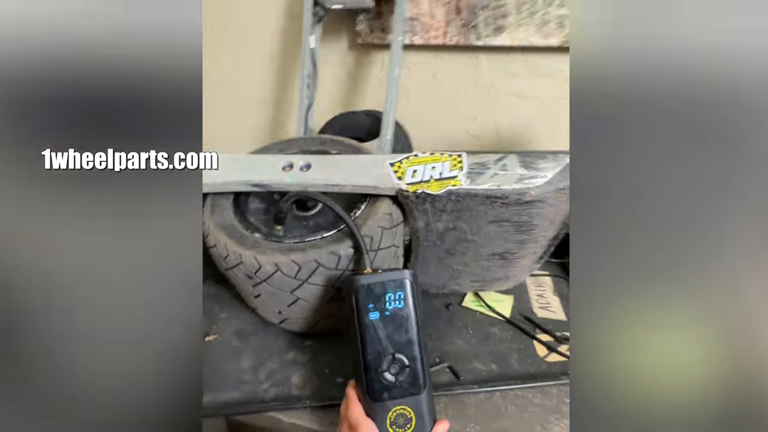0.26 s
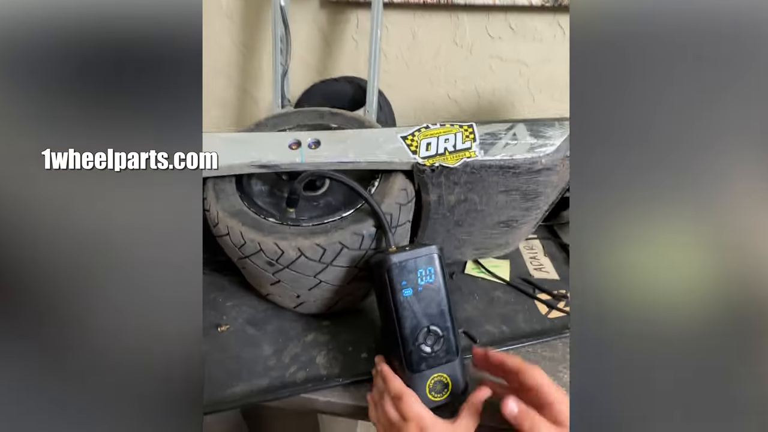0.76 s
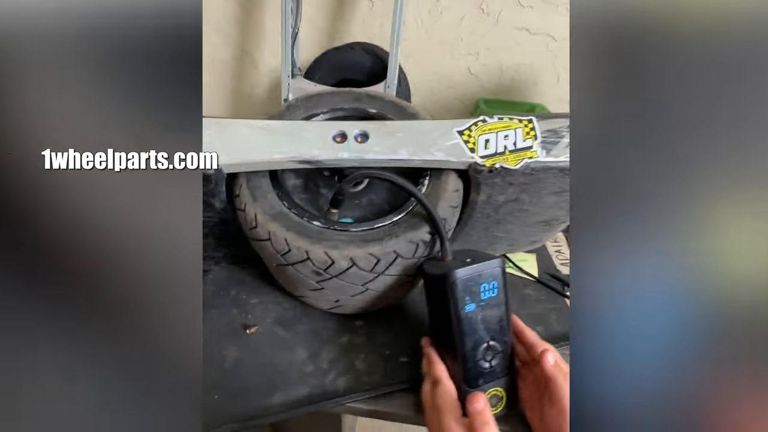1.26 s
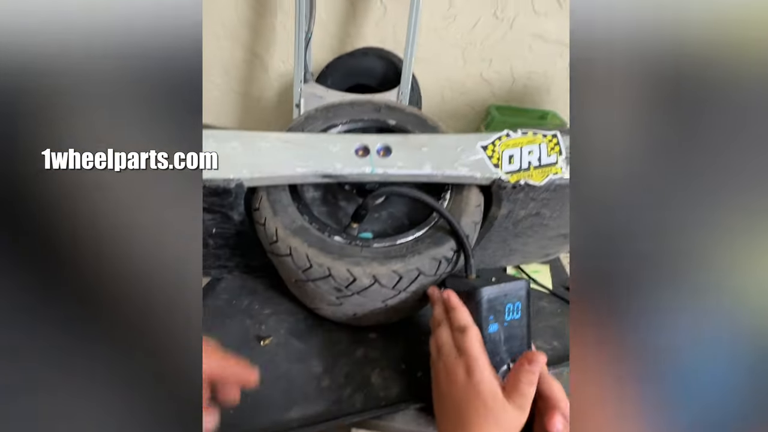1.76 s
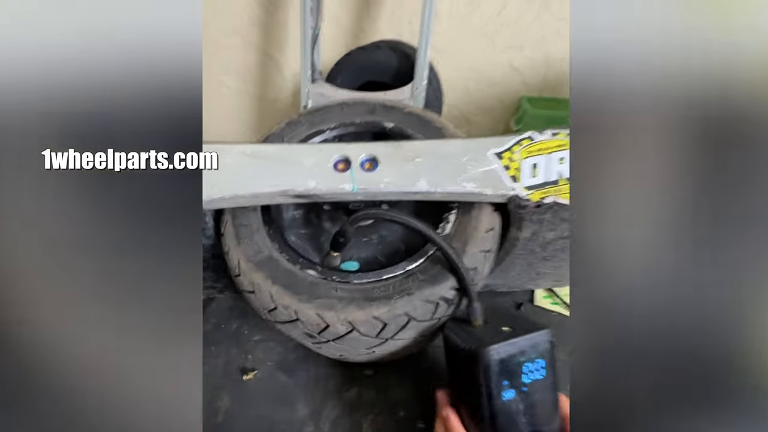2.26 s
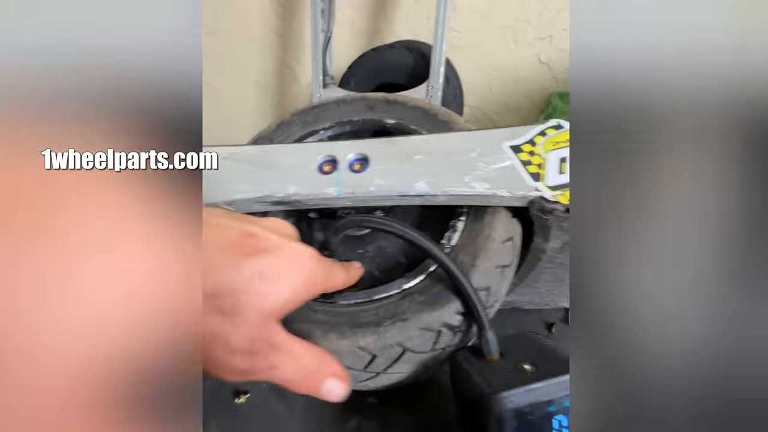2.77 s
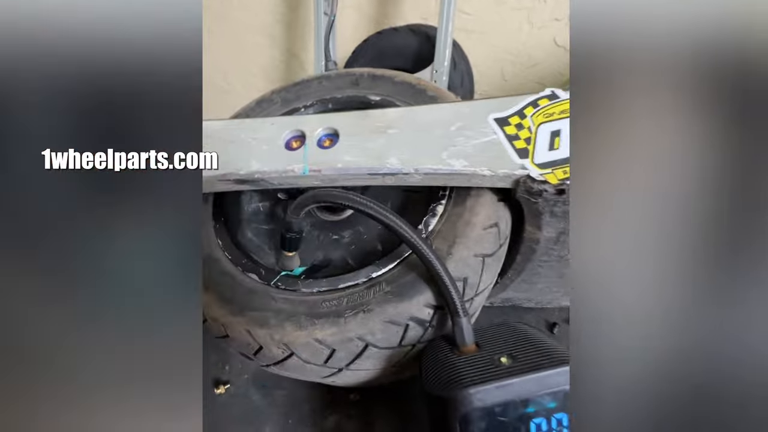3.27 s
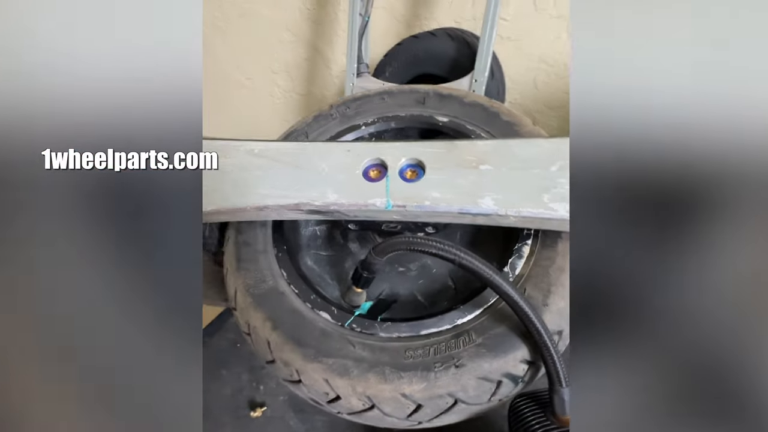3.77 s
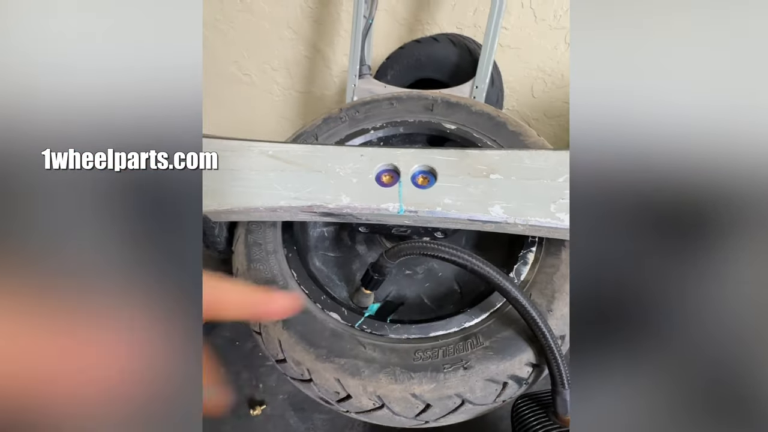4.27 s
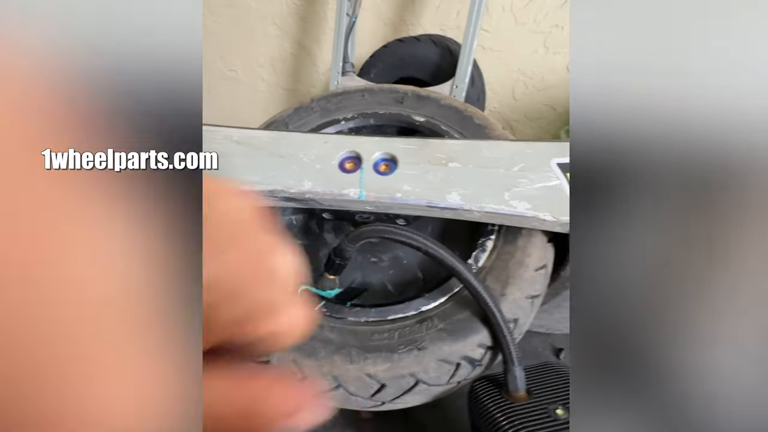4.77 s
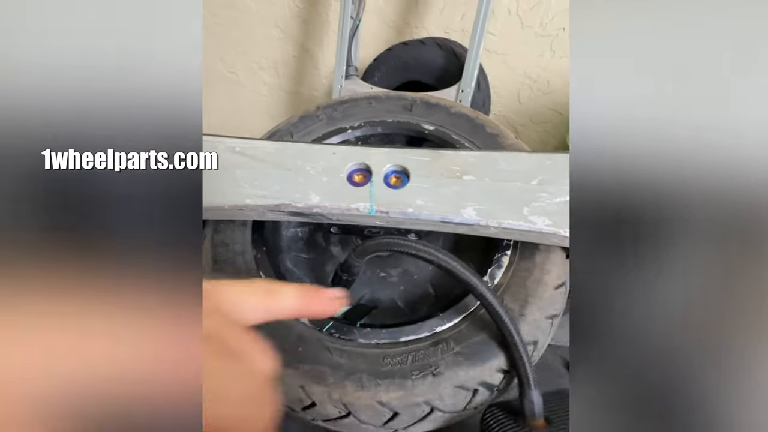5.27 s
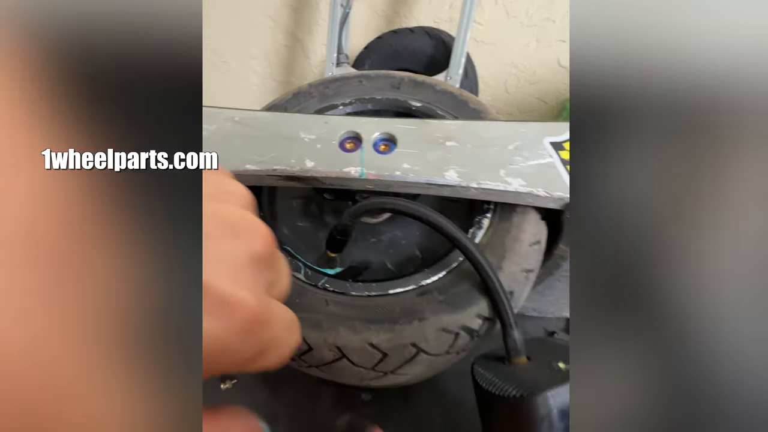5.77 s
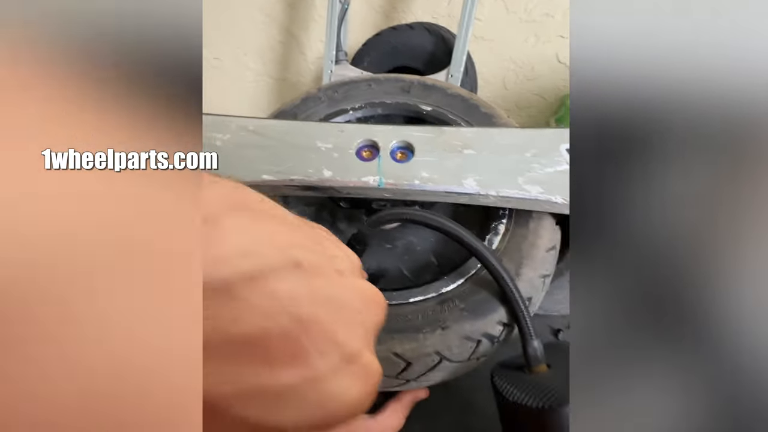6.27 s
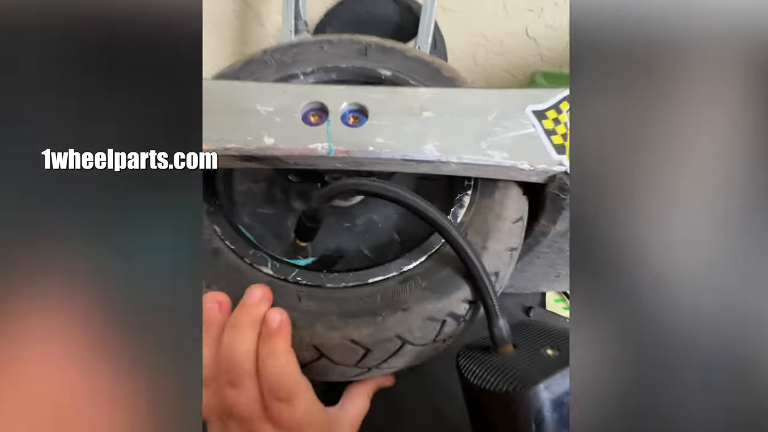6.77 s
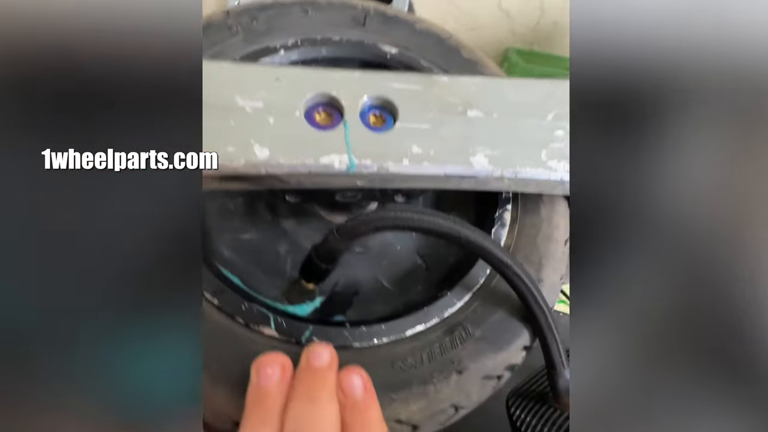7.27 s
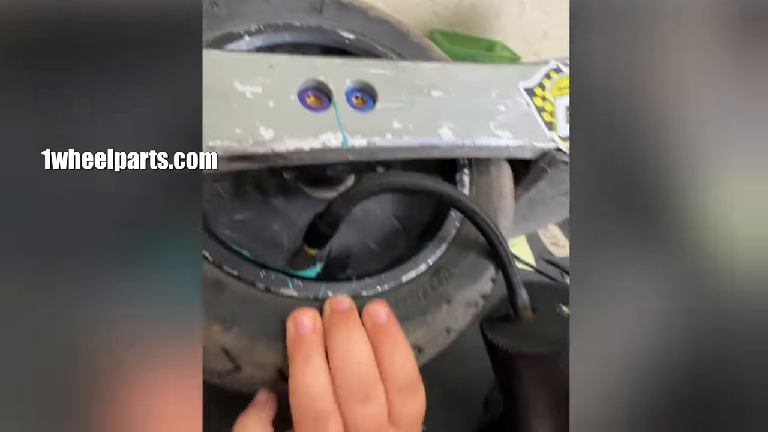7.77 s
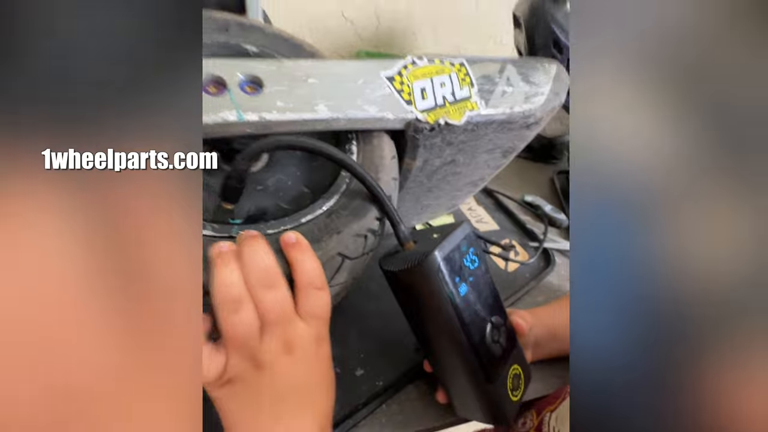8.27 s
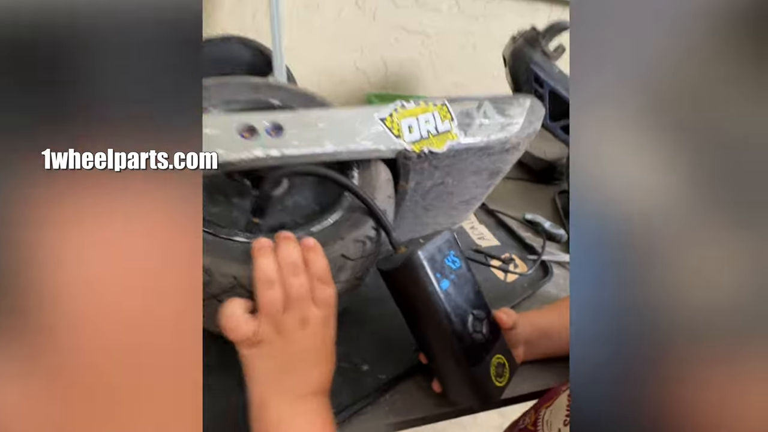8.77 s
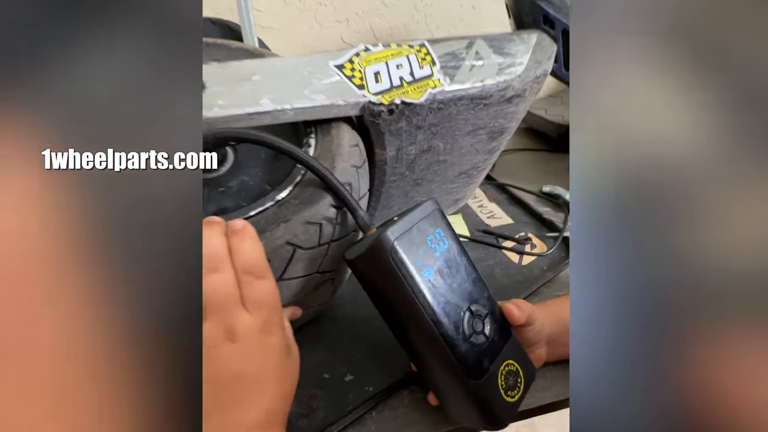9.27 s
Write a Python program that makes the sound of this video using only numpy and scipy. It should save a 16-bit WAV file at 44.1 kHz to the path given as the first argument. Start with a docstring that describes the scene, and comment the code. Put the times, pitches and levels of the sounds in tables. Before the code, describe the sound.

Close, harsh buzzing of a little piston tire pump with a high gear whine, low bench rumbles at first, then held in the hand.

```python
"""A hand-held piston compressor pumps a tyre in a workshop, slowing as the pressure builds.
From the start each stroke shakes the casing in crank multiples, loads the whining gear mesh (40 teeth
driven by 11), knocks resonances out of the loose parts and swells a narrow band of filtered noise.
At first the unit rests on the bench in three spells, with bumps: low tones buzz and noise rumbles.
From about five seconds on it is only lifted, turned and tilted in the hand, shifting the balance."""
import sys
import numpy as np
from scipy import signal
from scipy.io import wavfile
from scipy.ndimage import map_coordinates

SR = 44100
rng = np.random.default_rng(int(sys.argv[2]) if len(sys.argv) > 2 else 0)


def how_loud(loudness_db):
    """Turn decibels into a plain amplitude multiplier (0 dB gives 1, 20 dB gives 10)."""
    steps = np.asarray(loudness_db, float) / 20
    return 10 ** steps


def transcribe(u):
    """Save the signal u as a 16-bit wav file named by the first command-line argument.

    u: samples, shape (n,) or (channels, n), limited to [-1, 1]; the rate is SR.
    q: integer samples, one column per channel.
    """
    v = np.clip(np.atleast_2d(u).T, -1, 1)
    q = np.round(v * 32767).astype(np.int16)
    wavfile.write(sys.argv[1], SR, q)


N = 419391   # samples, about 9.51 s

# Crank speed. Each row: time in seconds, speed in turns per second.
CRANK_SPEED = [(0.0, 46.109), (0.95, 45.949), (1.9, 45.765), (2.85, 45.527), (3.8, 45.405), (4.76, 45.162),
               (5.71, 45.071), (6.66, 44.89), (7.61, 44.725), (8.56, 44.636), (9.51, 44.506)]
# How the hand holds the pump. Each row: time in seconds, lift in cm, turn in rad, tilt in rad.
HAND_HOLD = [(0.0, 1.2, -1.3, -1.1), (0.6, -0.5, -2, -1.5), (0.85, -2.7, -1.86, -1.2),
             (1.2, -1.7, -1.3, -0.75), (1.6, -2.6, -2, -0.53), (2.1, -0.2, -1.6, -0.88),
             (2.5, -1, -0.5, -0.65), (2.95, -2.5, 0.5, -0.85), (3.3, -3, 0.2, -1.2),
             (3.55, -0.7, 1.04, -0.86), (3.9, 0, 1.1, -0.64), (4.3, -0.9, 0.5, -0.22),
             (4.55, -1, 0.3, -1.1), (4.85, -0.5, -0.3, -0.6), (5.0, 1, -0.1, -0.0022),
             (5.3, 0.4, 0.86, 0.084), (5.75, -0.1, 0.5, 1.1), (6.15, 0, -0.5, 1.45), (6.5, -0.2, 0.7, 0.84),
             (7.1, 3, 1.5, 1.03), (7.9, 0.7, 2.05, 0.7), (8.6, 0.7, 2, 0.51), (9.0, 0.9, 2.5, 1.15),
             (9.51, 0, 2, 0.74)]
# How each part radiates. Each entry: level in dB before its source's trim, dB per cm of lift,
# swing with the turn in dB, direction it faces in rad, dB per rad of tilt.
PART_RADIATION = {"hum": (-50, -0.2, -0.4, -1.4, -1.07), "frame": (-50.5, 0.8, 6.5, 0.42, -0.9),
                  "casing": (-45.5, 0.74, -0.5, 3.0, 2.5), "cylinder": (-47, 0, 7, 0.52, 1.5),
                  "panel": (-59, 0.34, 6, 0, -3), "shell": (-46.5, 0.5, 1.5, 3.0, 2),
                  "mesh": (-42.5, 2, 3.5, 1.12, 0.97), "upper mesh": (-51.5, 1.4, 3.5, -1.47, -2.5),
                  "grille": (-51, 1.5, 9, 1.8, -5.5), "valve plate": (-59, 0.7, 5, -0.65, 0.5),
                  "fins": (-53.5, -0.5, 3.5, -1.5, -0.5), "air": (-51.5, -0.8, 1.8, 1.7, 1),
                  "buzz": (-66, -0.5, 2.5, -0.6, -1.5), "base": (-62, -0.2, 2.5, 1.6, 0.5),
                  "boom": (-75.5, 0.5, 4, 0.4, -0.8)}
# Stroke shake, one list each for low hum, casing and cylinder.
# Each row: multiple of the crank rate, relative level in dB.
STROKE_MULTIPLES = [
    [(4, -17), (7, -19), (8, -3), (9, -6), (10, 4)],
    [(13, -26), (14, -16), (15, -8.5), (16, -1), (18, 1.5), (19, -19), (20, 0.5), (21, 5.5), (22, 5),
     (23, -2), (24, -4), (25, -5), (26, -8.5), (27, -23)],
    [(28, -18), (29, 3.5), (30, -14), (31, -19), (32, -15), (33, -12), (34, 7.5), (35, 2)],
]
# Side panel tones. Each row: multiple of the crank rate, relative level in dB.
PANEL_MULTIPLES = [(11, 2), (12, -4)]
# Where the casing favours the gear side tones.
# Each row: time in seconds, centre by the tooth rate in Hz, centre by its octave in Hz.
WHINE_CENTRES = [(0.0, 1846, 3800), (0.65, 1884, 3740), (1.32, 1900, 3830), (1.85, 1790, 3680),
                 (2.78, 1910, 3720), (3.34, 1790, 3700), (3.78, 1800, 3730), (4.5, 1810, 3660),
                 (5.09, 1760, 3640), (5.64, 1790, 3760), (6.06, 1790, 3530), (6.7, 1790, 3640),
                 (7.9, 1820, 3600), (9.51, 1820, 3630)]
# Gear overtones. Each row: multiple of the tooth rate, level in dB.
TOOTH_OVERTONES = [(3, -71), (4, -68), (5, -65)]
# Colour of the broad rattle. Each row: frequency in Hz, relative level in dB per Hz.
RATTLE_COLOUR = [(24, -65), (40, -52), (117, -23), (214, -43), (255, -16.5), (319, -19), (453, -13.5),
                 (627, -2.5), (785, 1.5), (1230, -4), (1840, -2), (2300, -8.5), (5960, -17), (10600, -18),
                 (15800, -21.5)]
# Ringing of the body. Each row: centre in Hz, width in Hz, level in dB added to its part,
# gain at discharge in dB, gain at intake in dB, share that repeats each turn from 0 to 1.
BODY_RESONANCES = [(942, 276, -2, -7, -2, 0), (1553, 206, -1, -8, 5.5, 0.39), (1790, 280, -7, 6, 7.5, 0.8),
                   (3680, 300, -8, -42, 0, 0.45), (2420, 740, -8.5, -5.5, 3.5, 0.4),
                   (4490, 1500, -1, 12, 4.5, 0.4), (8250, 2600, -5.5, 9.5, 2, 0)]
# Spells on the bench. Each row: start in seconds, end in seconds, buzz level in dB before the bench trim,
# boom gain in dB, gain of the fifth crank multiple in dB.
BENCH_RESTS = [(-0.1, 1.41, -58, 0.1, 4), (1.45, 2.61, -58.5, 0.1, 2.5), (3.66, 4.8, -59, -2, -1),
               (4.32, 4.86, -60, 8, 9)]
# Bumps and slides on the bench top. Each row: time in seconds, length (bell spread) in seconds,
# rumble in dB before the bench trim, boom gain in dB, buzz gain in dB.
BENCH_BUMPS = [(1.39, 0.04, -89, 10, 3), (1.984, 0.04, -92, 4, 0.1), (2.48, 0.09, -79, 1.5, 0),
               (3.7, 0.061, -79, 1.5, 1), (4.38, 0.06, -85, 0.1, -3), (4.51, 0.03, -88, -1, 8),
               (4.63, 0.03, -95, 3, -3), (4.789, 0.04, -75, -1.5, 0)]

WHEEL_TEETH, PINION_TEETH = 40, 11
DISCHARGE_TURN, INTAKE_TURN = 0.733, 0.013   # where in a turn each valve opens
PANEL_ROTOR_DB, PANEL_SIDE_DB = -7, -18   # third rotor multiple, and its side tone one crank multiple up
WHINE_WIDTH_HZ, UPPER_WIDTH_HZ = 62.5, 144
WHINE_LEAN = 1.23   # stretches the bell downward and narrows it upward by this factor
RATTLE_DB, RATTLE_TOP_HZ = -43, 16500
MIC_PEAK_HZ, MIC_PEAK_WIDTH_HZ = 10594, 870   # where the microphone resonates
THIRD_DB, FIFTH_DB = -3, -4.5   # balance of the crank multiples in the buzz; rests raise or lower the fifth
HELD_SHARE = 0.08   # of the rotor's shaking that is heard off the bench
REST_EDGE_S, REST_FLICKER_DB = 0.03, 1.8
RUMBLE_DB, RUMBLE_FLICKER_DB = -96, 3.5   # steady floor before the bench trim, and its flicker


def rms_one(x):
    """Scale to rms 1."""
    return x / np.sqrt(np.mean(x ** 2) + 1e-20)


def in_time(rows):
    """Draw the columns of a curve, one value per sample."""
    seconds, *columns = np.transpose(rows)
    return [np.interp(np.arange(N) / SR, seconds, column) for column in columns]


def drift(rate_hz):
    """Slow chance with spread 1: coarse noise through a double one-pole low-pass."""
    r = np.exp(-200 * np.pi * rate_hz / SR)   # one coarse step is 100 samples
    coarse = rng.standard_normal(N // 100 + 1002)
    slow = signal.lfilter([1], [1, -2 * r, r * r], coarse)[1000:]   # skip the filter's start
    return np.interp(np.arange(N) / 100, np.arange(len(slow)), rms_one(slow))


def resonance(x, hz, width_hz):
    """Two-pole resonance with gain 1 on top."""
    r = np.exp(-np.pi * width_hz / SR)
    zeros = np.array([1, 0, -1]) * (1 - r * r) / 2
    poles = [1, -2 * r * np.cos(2 * np.pi * hz / SR), r * r]
    return signal.lfilter(zeros, poles, x)


def ringing(x, hz, width_hz):
    """The same resonance twice over, for steeper skirts; rms 1."""
    return rms_one(resonance(resonance(x, hz, width_hz), hz, width_hz))


def load(crank, discharge_db, intake_db, rise=0.13):
    """Gain over one turn: a quick move and slower return as each valve opens (rise in turns); rms 1."""
    since = [(crank / (2 * np.pi) - turn) % 1 / rise for turn in (DISCHARGE_TURN, INTAKE_TURN)]
    discharge, intake = [u * np.exp(1 - u) for u in since]
    return rms_one(how_loud(discharge_db * discharge + intake_db * intake))


def stroke_tones(crank, orders, waver_db, turn, scatter, sweep=0):
    """Crank multiples bunch into a shake at one point of the turn; sweep puts higher ones ahead; rms 1."""
    phases = np.cumsum(rng.normal(0, scatter, len(orders)) + sweep * np.arange(len(orders)))
    angle = crank - 2 * np.pi * turn
    tones = 0
    for (k, db), phase in zip(orders, phases):
        tones = tones + how_loud(db + waver_db * drift(1.0)) * np.cos(k * angle + phase)
    return rms_one(tones)


def cluster(crank, orders, centre_hz, width_hz, sweep, waver_db, waver_hz):
    """Crank multiples under a moving bell: a burst on each discharge that sweeps down in pitch; rms 1."""
    speed = in_time(CRANK_SPEED)[0]
    angle = crank - 2 * np.pi * (DISCHARGE_TURN + 0.1009)   # just after the valve opens
    middle = np.mean(orders)
    burst, power = 0, 0
    for k in orders:
        away = (k * speed - centre_hz) / width_hz
        leaning = np.where(away < 0, away / WHINE_LEAN, away * WHINE_LEAN)
        gain = how_loud(waver_db * drift(waver_hz)) * np.exp(-0.5 * leaning ** 2)
        burst = burst + gain * np.cos(k * angle + sweep * (k - middle) ** 2)
        power = power + gain * gain / 2
    return burst / np.sqrt(power)


def contacts(crank, change_per_s):
    """The same small knocks come round every turn and change slowly; rms 1."""
    size = 700   # points per turn
    patterns = rng.standard_normal((60, size))
    where = [np.arange(N) / SR * change_per_s, crank / (2 * np.pi) % 1 * size]
    return rms_one(map_coordinates(patterns, where, order=3, mode="wrap"))


def parts_heard():
    """Each part faces its own way, so its level in dB follows the lift, turn and tilt of the pump."""
    lift, turn, tilt = in_time(HAND_HOLD)
    return {name: db + lift_db * lift + swing_db * np.cos(turn - faces) + tilt_db * tilt
            for name, (db, lift_db, swing_db, faces, tilt_db) in PART_RADIATION.items()}


def casing(crank, motor, hum_db, base_db, frame_db, shell_db, cylinder_db, panel_db):
    """The body shakes with the stroke; the off-centre rotor adds side tones and beats."""
    low, middle, high = STROKE_MULTIPLES
    hum = how_loud(hum_db - 2.7) * stroke_tones(crank, low, 0.5, 0.9, 0.3, sweep=0.45)
    frame = how_loud(frame_db + 1.5) * np.cos(17 * crank)   # the seventeenth multiple sits on a frame resonance
    base = how_loud(base_db) * -np.sqrt(2) * np.cos(6 * crank)   # the sixth sits on the battery base
    wobble = 1 + 0.097 * np.cos(motor) + 0.26 * np.cos(2 * motor + 1.42)
    shell = how_loud(shell_db) * stroke_tones(crank, middle, 0.42, 0.92, 0.58, sweep=0.12)
    barrel = how_loud(cylinder_db - 7.5) * stroke_tones(crank, high, 0.8, 0.1196, 0.7, sweep=0.12)
    # the rotor beats with the crank multiples on the side panel
    rotor = how_loud(PANEL_ROTOR_DB) * np.cos(3 * motor) + how_loud(PANEL_SIDE_DB) * np.cos(3 * motor + crank)
    panel = sum(how_loud(db) * np.cos(k * crank) for k, db in PANEL_MULTIPLES) - rotor
    return hum + base + frame + wobble * (shell + barrel) + how_loud(panel_db) * np.sqrt(2) * panel


def gears(crank, mesh_db, upper_db):
    """Teeth meet 40 times a turn, loudest under load, and fall in pitch as the load slows the wheel."""
    centre_hz, upper_hz = in_time(WHINE_CENTRES)
    near_teeth = WHEEL_TEETH + np.arange(-6, 7)
    near_octave = 2 * WHEEL_TEETH + np.arange(-6, 9)
    whine = cluster(crank, near_teeth, centre_hz, WHINE_WIDTH_HZ, 0.2, waver_db=1.7, waver_hz=1.8)
    octave = cluster(crank, near_octave, upper_hz, UPPER_WIDTH_HZ, 0.1, waver_db=5.0, waver_hz=2.4)
    teeth = WHEEL_TEETH * (crank + 0.029 * np.cos(crank - 5.3))   # the tooth rate sways once a turn
    upper = sum(how_loud(db + 2.2 * drift(0.8)) * np.cos(k * teeth) for k, db in TOOTH_OVERTONES)
    upper = np.sqrt(2) * upper * load(crank, 8.0, 3.0)
    return how_loud(mesh_db - 0.8) * whine + how_loud(upper_db - 2.5) * octave + upper


def rattle(crank, parts_db):
    """Play in bearings and valves: broad noise that pulses with the stroke and rings the body resonances."""
    hz, level = np.transpose(RATTLE_COLOUR)
    knocks = contacts(crank, change_per_s=1.5)
    white = rng.standard_normal((2, N)) + 0.85 * knocks   # neighbouring bands take turns between the two
    edges = np.geomspace(40, RATTLE_TOP_HZ, num=40)
    broad, shared = 0, drift(16)
    for k, (low, high) in enumerate(zip(edges, edges[1:])):
        band_filter = signal.butter(2, [low, high], "band", fs=SR, output="sos")
        band = signal.sosfilt(band_filter, white[k % 2])
        colour_db = np.interp(np.log(low * high) / 2, np.log(hz), level)
        broad = broad + how_loud(colour_db + 1.5 * drift(0.5) + 0.5 * shared) * band
    out = how_loud(RATTLE_DB) * rms_one(broad) * load(crank, 4.15, 1.2, rise=0.087)
    for row, part_db in zip(BODY_RESONANCES, parts_db):
        centre_hz, width_hz, db, discharge_db, intake_db, share = row
        drive = np.sqrt(share) * knocks + np.sqrt(1 - share) * rng.standard_normal(N)
        pulse = load(crank, discharge_db, intake_db, rise=0.075)
        out += how_loud(part_db + db) * ringing(drive, centre_hz, width_hz) * pulse
    return out


def hiss(crank, hiss_db):
    """A narrow band of hiss near 10.6 kHz, where the microphone resonates, swells on every stroke."""
    band = ringing(rng.standard_normal(N), MIC_PEAK_HZ, MIC_PEAK_WIDTH_HZ)
    return how_loud(hiss_db - 0.54 + 1.1 * drift(24)) * band * load(crank, 8.9, 0.85)


def touches(buzz_db, boom_db):
    """Rests and bumps set the buzz, boom, rumble and fifth-multiple levels in dB; last, resting contact."""
    t, resting, fifth_db = np.arange(N) / SR, 0, FIFTH_DB
    flicker_db = REST_FLICKER_DB * drift(2.7)
    rumble = how_loud(RUMBLE_DB + RUMBLE_FLICKER_DB * drift(4.0))
    for start, end, rest_db, gain_db, fifth_gain_db in BENCH_RESTS:
        down = np.clip(np.minimum(t - start, end - t) / REST_EDGE_S + 0.5, 0, 1)
        buzz_db = buzz_db + down * (rest_db + flicker_db - buzz_db)
        boom_db = boom_db + down * gain_db
        fifth_db = fifth_db + down * fifth_gain_db
        resting = resting + down   # 1 per spell; overlapping spells add up
    for seconds, length, rumble_db, boom_gain_db, buzz_gain_db in BENCH_BUMPS:
        bell = np.exp(-0.5 * ((t - seconds) / length) ** 2)
        rumble = rumble + how_loud(rumble_db) * bell
        boom_db = boom_db + boom_gain_db * bell
        buzz_db = buzz_db + buzz_gain_db * bell
    return buzz_db, boom_db, 20 * np.log10(rumble), fifth_db, resting


def bench(crank, motor, buzz_db, boom_db, rumble_db, fifth_db, resting):
    """The bench takes up the lowest multiples; on contact the rotor comes through, and the top rumbles."""
    contact = np.maximum(resting, HELD_SHARE)
    buzz = ringing(rng.standard_normal(N), 250, 140)
    rotor = 0.4 * np.cos(motor) + 0.45 * np.cos(motor + crank)
    rotor = rotor + 0.3 * np.cos(4 * crank + 1.6) + 0.35 * buzz
    tones = stroke_tones(crank, [(3, THIRD_DB), (5, fifth_db)], 0.71, 0.327, 2.2) + contact * rotor
    rumble = ringing(rng.standard_normal(N), 68, 50) + 0.97 * buzz
    boom = np.sqrt(2) * (how_loud(boom_db - 0.5) * np.cos(2 * crank) + how_loud(-90) * np.cos(crank))
    return how_loud(buzz_db - 2.5) * tones + boom + how_loud(rumble_db + 2.0) * rumble


def scene():
    """All parts turn with one crank angle."""
    db = parts_heard()
    crank = 2 * np.pi * np.cumsum(in_time(CRANK_SPEED)[0]) / SR
    crank = crank + 0.016 * drift(2.5)   # the hand and the battery are never quite steady
    motor = crank * WHEEL_TEETH / PINION_TEETH
    body = ("hum", "base", "frame", "shell", "cylinder", "panel")
    pump = casing(crank, motor, *[db[name] for name in body])
    pump += gears(crank, db["mesh"], db["upper mesh"])
    loose = ("casing", "cylinder", "mesh", "upper mesh", "grille", "valve plate", "fins")
    pump += rattle(crank, [db[name] for name in loose])
    pump += hiss(crank, db["air"])
    pump += bench(crank, motor, *touches(db["buzz"], db["boom"]))
    return pump[None]


def band_limit(x):
    """A steep low-pass at the top of the band."""
    return signal.sosfilt(signal.butter(12, 16020, fs=SR, output="sos"), x)


def record(dry):
    """The finished mix is the scene as it stands."""
    return band_limit(dry)


dry = scene()
out = record(dry)
transcribe(out)
```